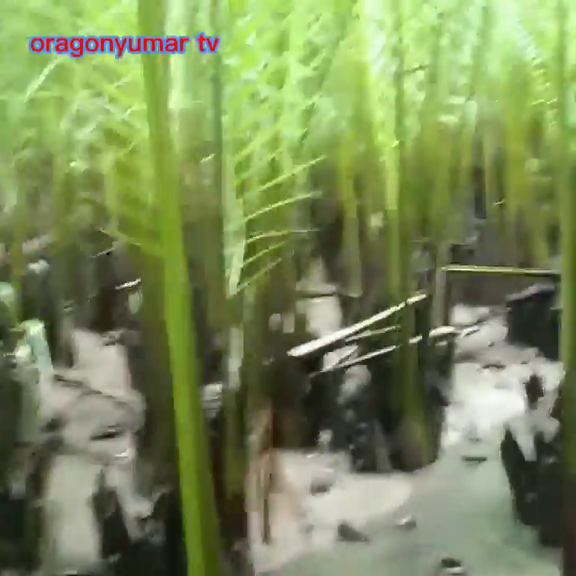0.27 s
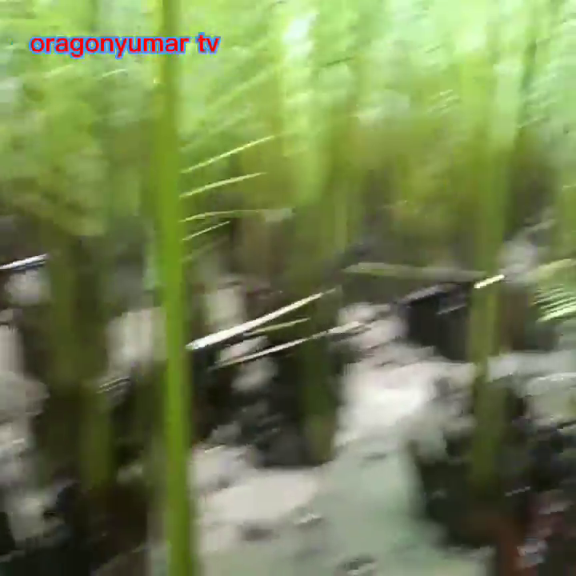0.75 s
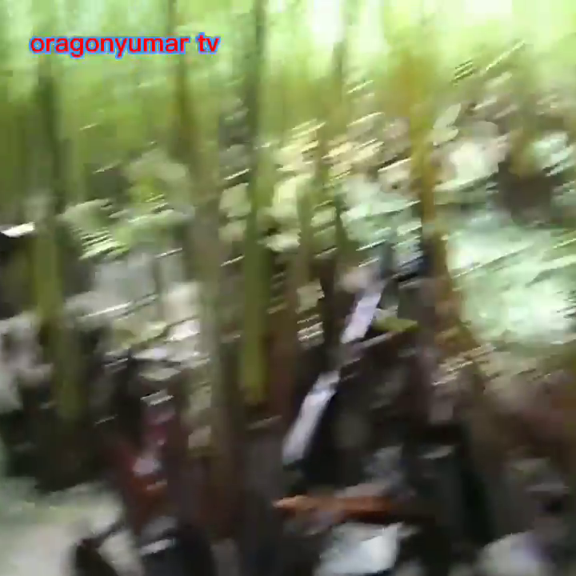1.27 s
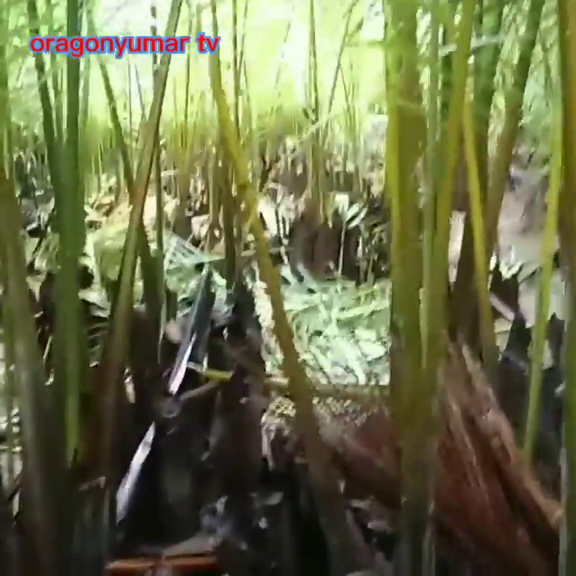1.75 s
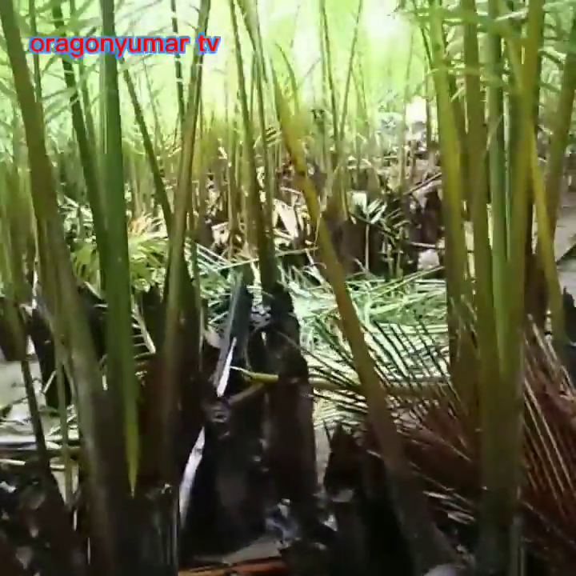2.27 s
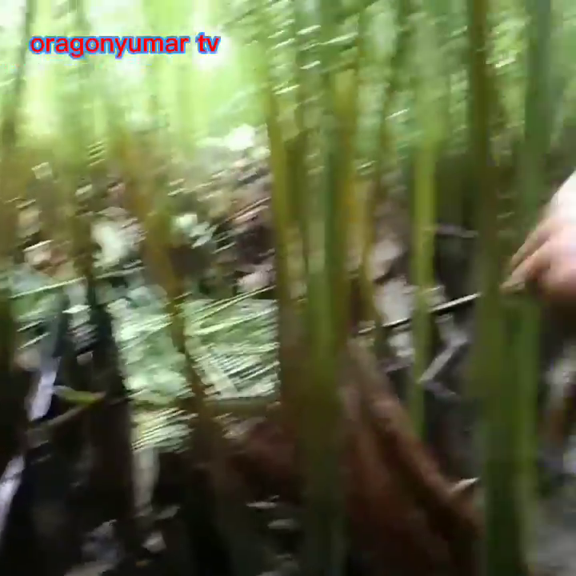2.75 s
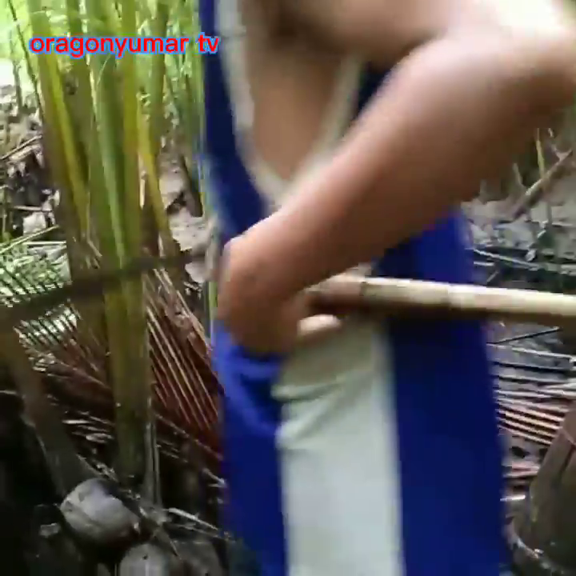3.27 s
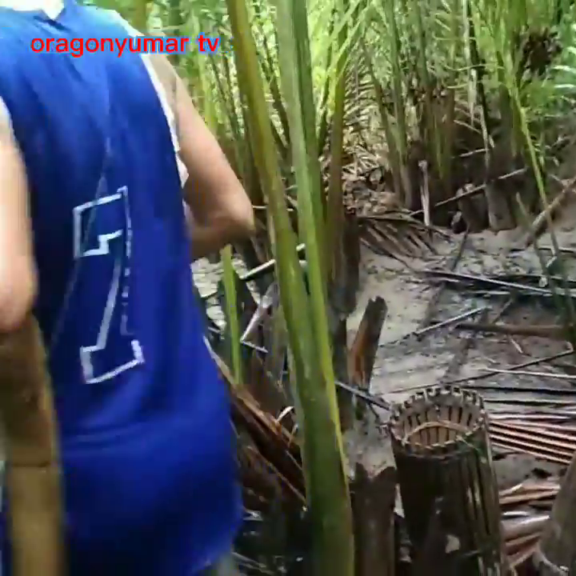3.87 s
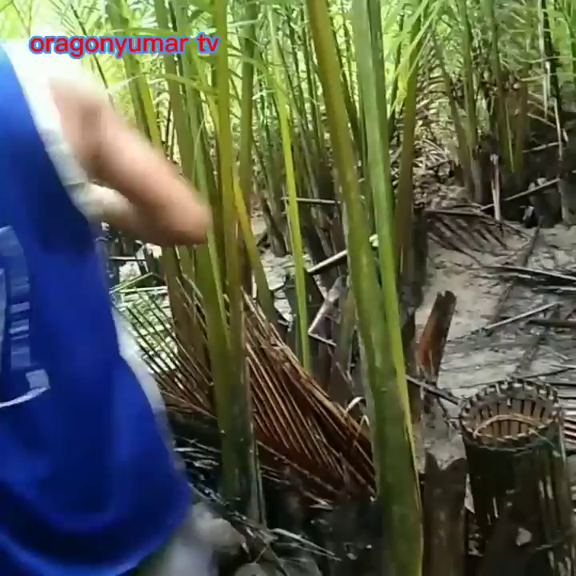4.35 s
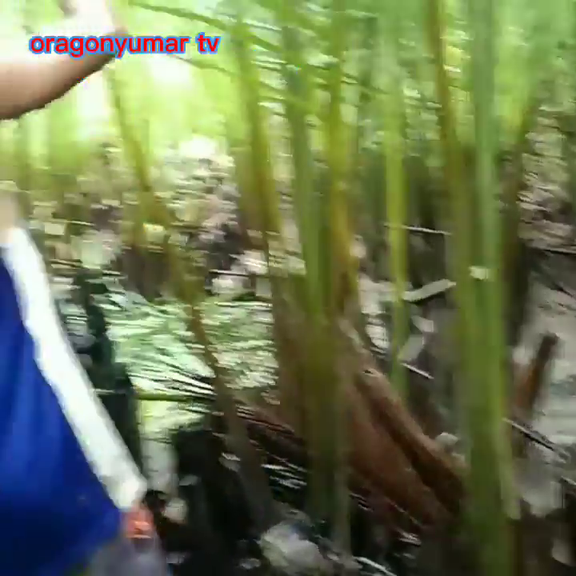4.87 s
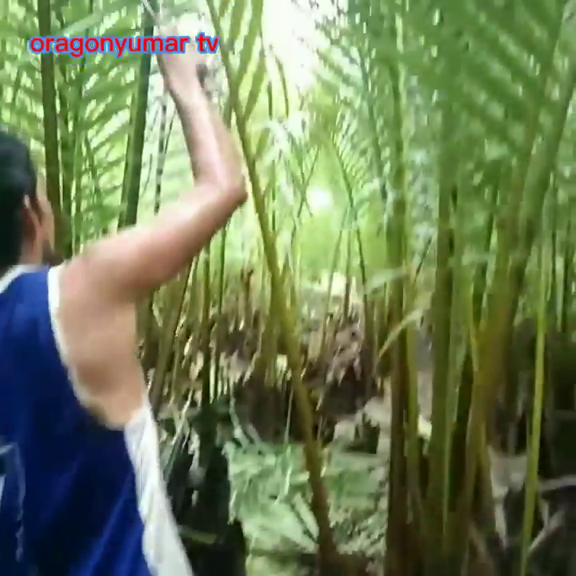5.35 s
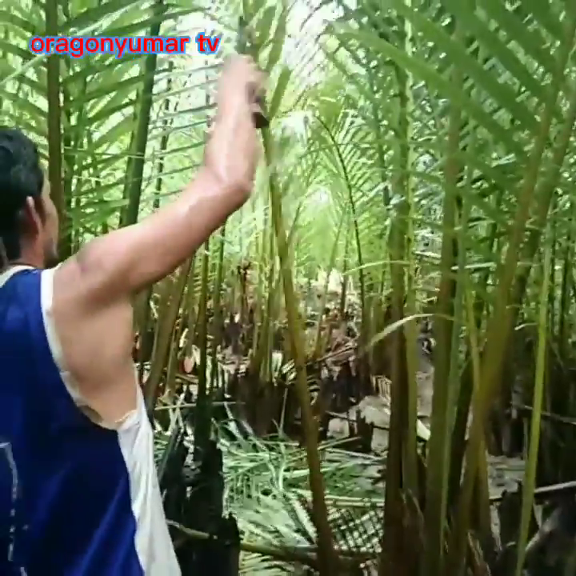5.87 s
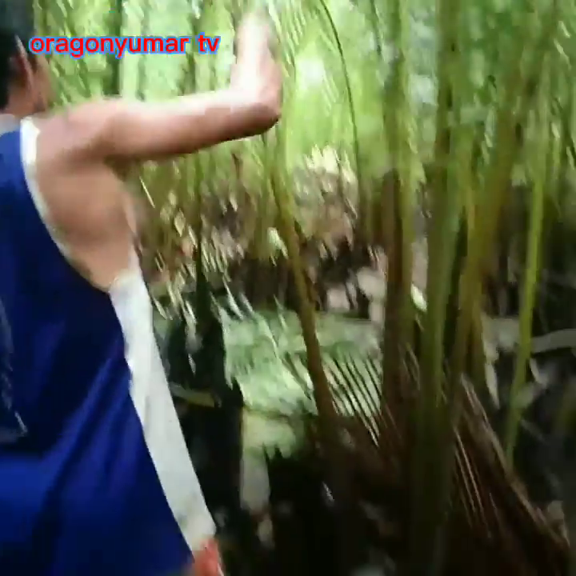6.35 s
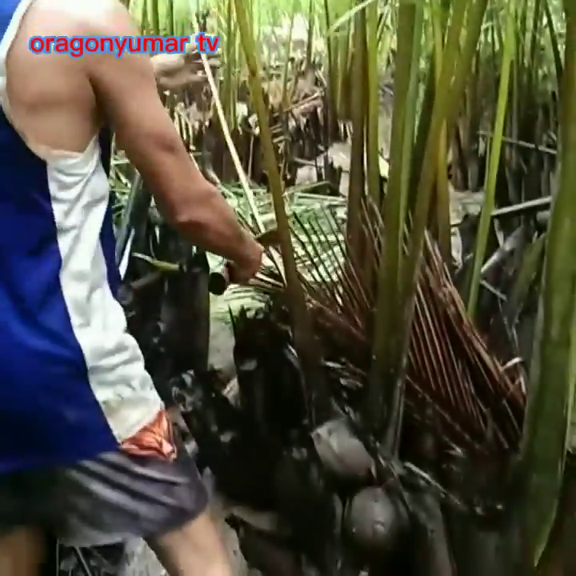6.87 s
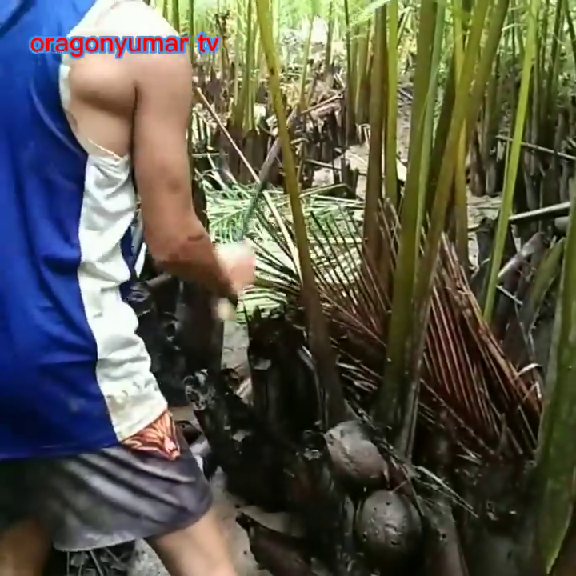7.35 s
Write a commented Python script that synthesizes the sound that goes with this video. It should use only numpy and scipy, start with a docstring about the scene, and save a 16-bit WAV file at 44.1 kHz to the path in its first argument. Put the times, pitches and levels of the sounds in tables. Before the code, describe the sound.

Someone pushes through a palm thicket: brittle ribs crack, the loudest near one second, and fronds flick and brush. Mud pops softly underfoot with a few hollow plops. After a sparser stretch a stalk squeaks upward, a blade knocks into a thick stem, and leaflets rake in a rushing crackle, ending in hard, leafy strikes. Close phone microphone, dull top end, short scatter from stems, steady leaf hiss behind.

```python
"""A man wades through a hissing palm swamp: ribs crack and ring, dry fronds crackle in short brushes and flicks.
From about 1.8 s mud plops and low knocks sound, as short damped sines; near 4.9 s a stalk squeaks, a rising sine.
At 5.8 s he chops a stalk, which rings in its modes; at 6.2 s the frond drags down in a dense crackle of slips.
More blows follow to the end. Short gliding noise bands scrape or brighten other sounds; a narrow-band phone is
close by."""
import sys
import numpy as np
from scipy import signal
from scipy.fft import rfft, irfft
from scipy.io import wavfile
from scipy.ndimage import uniform_filter1d, minimum_filter1d, map_coordinates

SR = 44100
rng = np.random.default_rng(int(sys.argv[2]) if len(sys.argv) > 2 else 0)


def log_audio(samples):
    """Write samples as a 16-bit WAV file to the path given in sys.argv[1]."""
    # one column per channel
    frames = np.atleast_2d(samples).T
    # limit to full scale, then quantise
    limited = np.clip(frames, -1, 1)
    pcm = np.round(limited * 32767).astype(np.int16)
    wavfile.write(sys.argv[1], SR, pcm)


N = 335601
TIME = np.arange(N) / SR


def from_db(db):
    """Decibels to gain."""
    return 10 ** (np.asarray(db) / 20)


def rms_one(x):
    """Scale to unit rms."""
    return x / np.sqrt(np.mean(x ** 2) + 1e-20)


def in_time(rows):
    """Curve columns joined by straight lines, one value a sample."""
    time_s, *columns = np.transpose(rows)
    return [np.interp(TIME, time_s, column) for column in columns]


def during(rows):
    """True between a curve's first and last point."""
    return (TIME > rows[0][0]) & (TIME < rows[-1][0])


def butter(x, hz, kind, order=2):
    """Causal Butterworth filter."""
    return signal.sosfilt(signal.butter(order, hz, kind, fs=SR, output="sos"), x)


def drift(rate_hz):
    """Smooth random curve of unit rms, from 2 * rate_hz knots a second."""
    knots = rng.standard_normal(4000)
    return rms_one(map_coordinates(knots, [TIME * 2 * rate_hz], order=3, mode="wrap"))


def colour(x, spectrum, size=2048):
    """Causal (minimum-phase) filter that follows a spectrum."""
    hz, db = np.transpose(spectrum)
    grid_hz = np.maximum(np.arange(size // 2 + 1) * SR / size, 1)
    gain = from_db(np.interp(np.log(grid_hz), np.log(hz), db))
    cepstrum = irfft(np.log(gain))
    # fold the cepstrum: minimum phase
    cepstrum[1:size // 2] *= 2
    cepstrum[size // 2 + 1:] = 0
    impulse = irfft(np.exp(rfft(cepstrum)))
    return signal.fftconvolve(x, impulse)[:len(x)]


def ring(clicks, hz, t60_s):
    """Two-pole resonator: a unit click sets a decaying sine of height 1 ringing."""
    r = np.exp(-np.log(1000) / (t60_s * SR))
    w = 2 * np.pi * hz / SR
    return signal.lfilter([0, np.sin(w)], [1, -2 * r * np.cos(w), r * r], clicks + 1e-18)


def add(out, time_s, sound):
    """Mix a sound in at its time."""
    at = max(int(time_s * SR), 0)
    out[at:at + len(sound)] += sound[:N - at]


def swell(rise_s, decay_s, curve=0.62):
    """Leaves load up, then die away as they spring free."""
    t = TIME[:SR]
    return np.minimum(t / rise_s, 1) ** curve * np.exp(-np.maximum(t - rise_s, 0) / decay_s)


def crackle(per_s, spread_db, clump_db, cycles, count=24):
    """Fibres slip in clumps; each slip ticks and rings one leaflet, t60 a set number of cycles."""
    clumps = from_db(clump_db * drift(130))
    sizes = from_db(spread_db * np.minimum(rng.exponential(1, N), 3)) * rng.choice([-1, 1], N)
    slips = sizes * clumps * (rng.random(N) < per_s / SR)
    leaflet = rng.integers(0, count, N)
    rings = np.zeros(N)
    for k, hz in enumerate(np.geomspace(900, 7400, count)):
        rings += ring(slips * (leaflet == k), hz, cycles / hz) * hz ** 0.52
    return rms_one(rms_one(slips) + 0.57 * rms_one(rings))


RIB_HZ, LEAF_HZ = 1100, 3610  # band edges: stalk | midribs | leaflets


def frond_parts(x):
    """Leaflets sound high, midribs in the middle, the stalk low; rms 1 each."""
    leaflets = rms_one(butter(x, LEAF_HZ, "high", order=4))
    midribs = rms_one(butter(x, [RIB_HZ, LEAF_HZ], "band", order=4))
    stalk = rms_one(butter(x, RIB_HZ, "low", order=4))
    return leaflets, midribs, stalk


# grove hiss before trim: (time [s], level [dB])
GROVE_LEVEL = [(0, -34.5), (.55, -32), (1.3, -34), (2.1, -31.5), (3.6, -32), (5.7, -34.3), (6.15, -31.5),
               (7.1, -31.5)]
# hiss spectrum: (frequency [Hz], relative density [dB per Hz])
GROVE_SPECTRUM = [(60, -31.5), (180, -13), (280, -8.5), (600, -8.5), (1100, -5), (1700, -3), (2450, 2.5),
                  (3300, -3), (4200, 0), (4900, -2), (6400, 3), (6950, 0), (7500, -20), (8000, -42.5)]
# handling rumble before trim: (time [s], level [dB])
RUMBLE_LEVEL = [(0, -57.5), (5.7, -55), (6.9, -55.5), (7.6, -49)]
# rumble spectrum: (frequency [Hz], relative density [dB per Hz])
RUMBLE_SPECTRUM = [(20, -36), (35, -34.5), (52, -8.5), (85, -2.5), (150, -3), (210, -10.5), (400, -21.5)]


def grove(hiss_trim_db=-2.0, ticks_db=-12, rumble_trim_db=0.5):
    """Far leaves merge into a hiss with faint ticks; the hand-held phone rumbles."""
    far = rng.standard_normal(N) * from_db(.5 * drift(9.7))
    ticks = from_db(ticks_db) * crackle(per_s=320, spread_db=4.5, clump_db=7.0, cycles=69)
    hiss = rms_one(colour(far + ticks, GROVE_SPECTRUM))
    rumble = colour(rng.standard_normal(N), RUMBLE_SPECTRUM, size=8192)
    rumble = rms_one(butter(rumble, [40, 500], "band"))
    hiss_gain = from_db(in_time(GROVE_LEVEL)[0] + hiss_trim_db)
    rumble_gain = from_db(in_time(RUMBLE_LEVEL)[0] + rumble_trim_db)
    return hiss_gain * hiss + rumble_gain * rumble


def wet_mud(per_s=40, cycles=9, level_db=-55, count=16):
    """Tiny air pockets keep opening in the trodden mud, each a faint, damped pop at one of several pitches."""
    pops = (rng.random(N) < per_s / SR) * from_db(3 * rng.standard_normal(N))
    pocket = rng.integers(0, count, N)
    rings = np.zeros(N)
    for k, hz in enumerate(np.geomspace(360, 1500, count)):
        rings += np.sqrt(hz) * ring(pops * (pocket == k), hz, cycles / hz)
    return from_db(level_db) * rms_one(rings)


# mud plops, and low knocks near 250-290 Hz:
# (time [s], sine level before fades [dB], start pitch [Hz])
PLOPS_AND_KNOCKS = [(1.757, -26.5, 1220), (1.76, -32.5, 670), (2.298, -28, 270), (2.559, -17, 1030),
                    (2.598, -22.5, 1445), (2.797, -27, 930), (2.879, -21, 1790), (2.914, -30, 290),
                    (2.996, -34, 256), (4.979, -33.5, 260), (6.852, -30.5, 255)]
DECAY_AT_1KHZ_S = 0.0039


def plops_and_knocks(glide=0.028):
    """Short damped sines, slightly rising in pitch; lower ones ring longer."""
    out, t = np.zeros(N), TIME[:SR // 10]
    for time_s, db, hz in PLOPS_AND_KNOCKS:
        decay_s = DECAY_AT_1KHZ_S * np.sqrt(1000 / hz)
        turns = hz * (t + glide * t * t / (2 * decay_s))  # glide: pitch rise per decay time
        fade = np.exp(-t / decay_s) * (1 - np.exp(-t / 0.00026))
        add(out, time_s, from_db(db) * np.sin(2 * np.pi * turns) * fade)
    return out


# a stalk squeaking against another: (time [s], pitch [Hz], level before trim [dB])
STALK_SQUEAK = [(4.87, 3220, -44), (4.912, 3610, -29), (4.95, 3870, -32.5), (4.985, 4450, -25),
                (5.005, 5170, -34), (5.04, 5260, -32), (5.08, 5450, -47)]


def squeak(trim_db=-2.5, flutter_db=4.0):
    """Stick and slip between smooth stalks, unsteady and quickening."""
    hz, db = in_time(STALK_SQUEAK)
    turns = np.cumsum(hz * (1 + .022 * drift(600))) / SR
    gain = during(STALK_SQUEAK) * from_db(db + trim_db + flutter_db * drift(120))
    return gain * np.sin(2 * np.pi * turns)


# some scrapes, others brightening the squeak, drag, flicks and blows:
# (time [s], length [s], start [Hz], end [Hz], width [Hz], rms level before swell [dB])
GLIDING_BANDS = [(0.225, .13, 2570, 2026, 300, -37), (2.255, .15, 1100, 1600, 460, -24.5),
                 (2.399, 0.13, 1443, 1350, 400, -32), (2.481, 0.1, 2200, 3025, 500, -30.5),
                 (4.243, .09, 4100, 4250, 700, -28), (4.759, 0.046, 5600, 5450, 350, -33.5),
                 (4.966, 0.11, 4300, 4400, 600, -34), (6.303, 0.22, 6520, 6780, 500, -18.5),
                 (6.43, 0.2, 850, 478, 248, -34.5), (6.566, 0.085, 3066, 2790, 500, -21),
                 (6.829, 0.071, 4840, 4610, 990, -14.5), (7.352, 0.089, 5400, 5300, 240, -32.5),
                 (7.481, 0.02, 4410, 4510, 600, -12)]


def gliding_bands():
    """Short noise bands: slow noise on a gliding carrier, swelling and fading."""
    out = np.zeros(N)
    for time_s, length_s, start_hz, end_hz, width_hz, db in GLIDING_BANDS:
        along = np.linspace(0, 1, max(int(length_s * SR), 2))
        noise = butter(rng.standard_normal((2, SR // 2)), width_hz / 2, "low")[:, -len(along):]
        phase = 2 * np.pi * np.cumsum(start_hz + (end_hz - start_hz) * along) / SR
        sound = rms_one(noise[0] * np.cos(phase) + noise[1] * np.sin(phase))
        add(out, time_s, from_db(db) * np.sin(np.pi * along) * sound)
    return out


# ribs snapping: (time [s], peak [dB], ring [Hz], ring re crack [dB])
RIB_SNAPS = [(0.0372, -17, 3850, 14), (.069, -19.5, 3740, 3), (0.2342, -12, 6300, 0),
             (0.417, -15.5, 2840, -2.5), (.6087, -18, 6100, 3), (0.6543, -9.5, 3790, -1.5),
             (0.9682, 4.5, 3130, -3), (0.977, -20, 2680, 19), (0.9887, -9.5, 3200, 2),
             (1.161, -14, 6280, -12), (1.288, -6.5, 6800, -11), (1.8731, -15, 6530, -12),
             (2.125, -15, 6440, -1), (2.159, -10, 5550, 2), (2.165, -2.5, 3720, 3.5),
             (2.7475, -13, 3080, 5), (3.3275, -11.5, 4380, -1), (4.24, -10.5, 3250, 16),
             (4.431, -15, 2730, 0.5), (4.6457, -14, 3150, -2), (4.906, -10.5, 3660, -9),
             (6.7488, -8, 3850, 4.5), (6.7795, -10.5, 4860, 13), (6.8141, -5.5, 6000, -4),
             (7.491, -6, 2180, 6.5)]
# leaf spectrum, for cracks and brushes: (frequency [Hz], relative density [dB per Hz])
LEAF_SPECTRUM = [(50, -46), (150, -29), (260, -17.5), (600, -18.5), (1000, -18.5), (1400, -16),
                 (1900, -1.5), (2450, 3), (3400, -2), (4200, 4), (5100, 1.5), (6400, 8.5), (6950, 6),
                 (7550, -14), (8000, -34.5)]
# the more a rib rings, the longer it lasts; decay is for a ring as strong as the crack
SNAP_DECAY_S, RING_DB_PER_DOUBLING = .0015, 6.5


def snaps(wander=0.062):
    """A rib breaks with a brief crack and a well-damped, unsteady ring at its own pitch."""
    out, t = np.zeros(N), TIME[:SR // 20]
    for time_s, db, hz, ring_db in RIB_SNAPS:
        tear, bend = rng.standard_normal((2, len(t)))
        crack = rms_one(colour(tear, LEAF_SPECTRUM))
        turns = np.cumsum(hz * (1 + wander * rms_one(butter(bend, 800, "low")))) / SR
        rib_ring = rms_one(np.sin(2 * np.pi * turns))
        decay_s = SNAP_DECAY_S * 2 ** (ring_db / RING_DB_PER_DOUBLING)
        fade = (1 - np.exp(-t / 0.000084)) * np.exp(-t / decay_s)
        snap = (crack + from_db(ring_db) * rib_ring) * fade
        add(out, time_s, from_db(db) * snap / np.abs(snap).max())
    return out


# blade blows and knocks on the stalk: (time [s], level [dB])
BLOWS = [(5.828, -21), (5.836, -5.5), (5.963, -20.5), (6.851, -13), (6.905, -26), (7.495, -8.5)]
# the stalk's modes: (frequency [Hz], level re blow [dB], t60 [s])
STALK_MODES = [(88, -33, 0.34), (255, -25.5, 0.17), (358, -13.5, 0.067), (430, -17, 0.041),
               (496, -22.5, 0.18), (711, -26, 0.16), (940, -29.5, 0.11), (1024, -17.5, 0.046),
               (1300, -36, 0.046)]


def chop():
    """The blade bites and sets the thick stalk ringing in modes of alternating sign."""
    blows = np.zeros(N)
    for time_s, db in BLOWS:
        add(blows, time_s, from_db([db]))
    out = np.zeros(N)
    for k, (hz, db, t60_s) in enumerate(STALK_MODES):
        out += (-1) ** k * from_db(db) * ring(blows, hz, t60_s)
    return out


# leaves pushed aside or trodden on:
# (time [s], level [dB], length [s], midrib re level [dB], stalk re level [dB])
LEAF_BRUSHES = [(0.174, -31.5, 0.24, -8, -35), (0.536, -34, 0.048, -6, -6.5), (1.285, -26, .016, -7, -6.5),
                (1.617, -36, 0.15, -8, -11), (1.816, -29.5, .13, -18, -31), (1.864, -17, 0.026, -5.5, -21),
                (2.239, -26.5, 0.15, -0.5, -5.5), (2.311, -19.5, 0.093, 1.5, -23.5),
                (2.413, -20, 0.044, 0, -22), (2.471, -21, 0.072, -3, -32), (2.691, -34, 0.043, -.5, -14),
                (2.752, -28, 0.038, 3.5, -6), (3.329, -26.5, 0.1, -6.5, -32),
                (3.389, -23, 0.028, -5.5, -15.5), (4.233, -18, 0.032, -9.5, -26),
                (4.359, -25.5, 0.045, -11, -33), (4.757, -35.5, 0.11, -2.5, -12),
                (5.873, -26, 0.22, -23, -20), (5.943, -21, .065, -14, -16.5),
                (6.82, -13, 0.082, -20, -23.5), (6.891, -15, 0.039, -18.5, -20.5),
                (6.964, -29, 0.052, -11, -20), (7.527, -21, 0.078, -10, -21)]
# a bent frond springs free: (time [s], level [dB], decay [s], midrib re level [dB])
FROND_FLICKS = [(0.039, -35, 0.083, -11), (0.406, -29, .012, -3.5), (0.961, -23.5, 0.024, 0.5),
                (1.036, -27, 0.014, -9), (1.112, -28, 0.018, -26), (1.97, -28, 0.044, -24),
                (2.609, -27.5, 0.0088, 3.5), (4.208, -24.5, 0.04, 0.5), (4.282, -25.5, 0.015, 1),
                (4.427, -33, 0.048, -2.5), (4.641, -22, 0.034, -17.5), (5.212, -32.5, 0.067, -7),
                (5.827, -21.5, 0.028, -7), (6.67, -19, .018, -14), (6.748, -26, 0.023, -25),
                (6.779, -20.5, 0.0215, -24), (7.486, -10, 0.031, -9)]
RISE_SHARE = 0.4  # of a brush's length loads the leaves; the rest is its decay time
FLICK_RISE_S, FLICK_STALK_DB = 0.0052, -19  # rise shared with the crunch; stalk re level
CRUNCH_DB, CRUNCH_DECAY_S = -22.5, 0.022  # dull crunch of stalk fibre, level re the blow


def brushes():
    """Slow pushes, quick flicks and blade blows all set the same fronds crackling."""
    slips = crackle(per_s=6000, spread_db=1.5, clump_db=0.57, cycles=37)
    parts = frond_parts(colour(slips, LEAF_SPECTRUM))
    strokes = []
    for time_s, db, length_s, rib_db, stalk_db in LEAF_BRUSHES:
        shape = swell(RISE_SHARE * length_s, (1 - RISE_SHARE) * length_s)
        strokes.append((time_s, db, shape, rib_db, stalk_db))
    for time_s, db, decay_s, rib_db in FROND_FLICKS:
        strokes.append((time_s, db, swell(FLICK_RISE_S, decay_s), rib_db, FLICK_STALK_DB))
    power = np.zeros((3, N))  # overlapping strokes add in power
    for time_s, db, shape, rib_db, stalk_db in strokes:
        for part_power, part_db in zip(power, (0, rib_db, stalk_db)):
            add(part_power, time_s, (from_db(db + part_db) * shape) ** 2)
    crunch = swell(FLICK_RISE_S, CRUNCH_DECAY_S)
    for time_s, db in BLOWS:
        add(power[2], time_s, (from_db(db + CRUNCH_DB) * crunch) ** 2)
    return np.sum(np.sqrt(power) * parts, axis=0)


# force of the cut frond's drag: (time [s], level [dB])
DRAG_FORCE = [(6.24, -37.5), (6.276, -26), (6.288, -26.5), (6.332, -15), (6.584, -10), (6.65, -19)]
# drag spectrum: (frequency [Hz], relative density [dB per Hz])
DRAG_SPECTRUM = [(60, -64), (170, -43), (330, -22), (550, -22.5), (1080, -25), (1400, -29.5), (2450, -10),
                 (3200, -20), (4400, -1.5), (5100, -6), (6000, 0), (6750, 4), (7500, -16.5), (8000, -23)]
# leaflets, midribs, stalk: level re the force [dB]
DRAG_PART_LEVELS_DB = [-0.5, -15.5, -22]
# leaflets, midribs, stalk: decay once the frond comes free [s]
DRAG_PART_DECAYS_S = [0.051, 0.023, .015]


def drag(catch_db=1.0):
    """Rows of leaflets rake over each other in a dense, bright crackle, catching and letting go."""
    slips = crackle(per_s=9000, spread_db=1.5, clump_db=1.3, cycles=40)
    parts = frond_parts(colour(slips, DRAG_SPECTRUM))
    force = from_db(in_time(DRAG_FORCE)[0] + catch_db * drift(30))
    force = (TIME > DRAG_FORCE[0][0]) * force
    freed_s = np.clip(TIME - DRAG_FORCE[-1][0], 0, 1)
    rake = np.zeros(N)
    for db, decay_s, part in zip(DRAG_PART_LEVELS_DB, DRAG_PART_DECAYS_S, parts):
        rake += from_db(db) * np.exp(-freed_s / decay_s) * part
    return force * rake


def stems(x, echo_db=-15, decay_s=0.016):
    """The crowded stems scatter back many faint, early echoes."""
    t = TIME[:SR // 5]
    hits = rng.standard_normal(len(t)) * (rng.random(len(t)) < .03)
    echoes = hits * (t > .003) * np.exp(-t / decay_s)
    echoes /= np.linalg.norm(echoes)
    return x + from_db(echo_db) * signal.fftconvolve(x, echoes)[:N]


def scene():
    """Close rustles and snaps over the hiss of the grove; the sharp sounds echo off the stems."""
    sharp = snaps() + plops_and_knocks() + wet_mud() + squeak() + chop()
    return (brushes() + drag() + gliding_bands() + stems(sharp) + grove())[None]


CUTOFF_HZ = 7500


def voice_band(x):
    """Steep elliptic low-pass at the top of the phone's band."""
    return signal.sosfilt(signal.ellip(10, .1, 75, CUTOFF_HZ, fs=SR, output="sos"), x)


def record(dry):
    """A fast limiter holds the peaks near full scale, and the phone cuts all above its band."""
    allowed = 1 / np.maximum(np.abs(voice_band(dry)), 1)
    gain = uniform_filter1d(minimum_filter1d(allowed, size=90), size=60)
    return voice_band(gain * dry)


dry = scene()
out = record(dry)
log_audio(out)
```